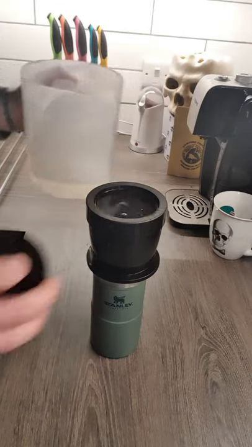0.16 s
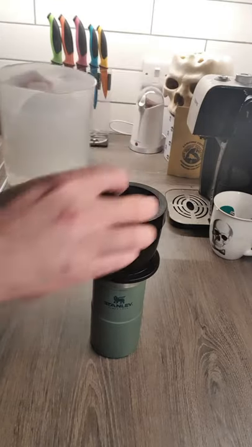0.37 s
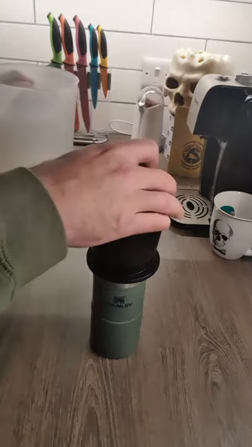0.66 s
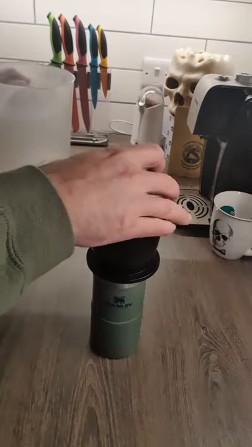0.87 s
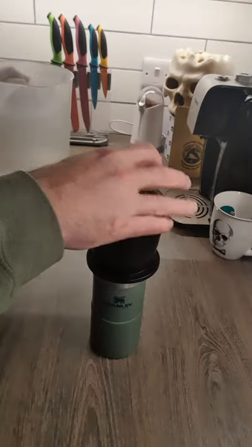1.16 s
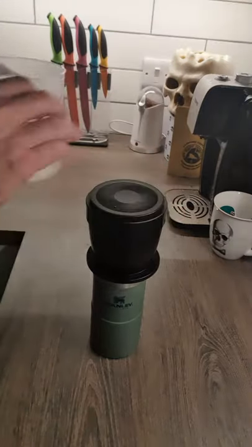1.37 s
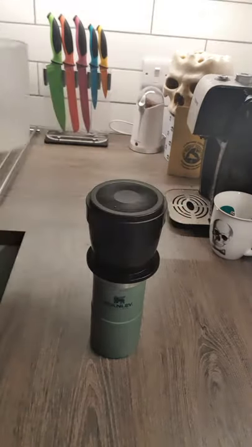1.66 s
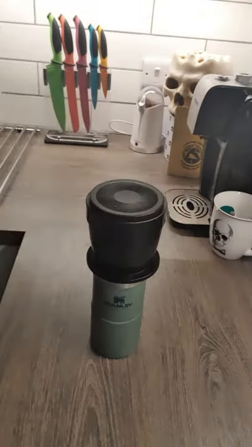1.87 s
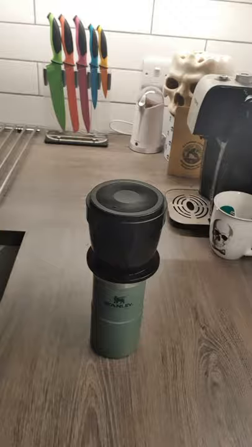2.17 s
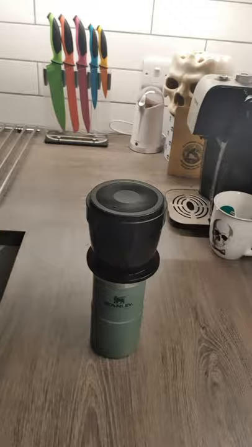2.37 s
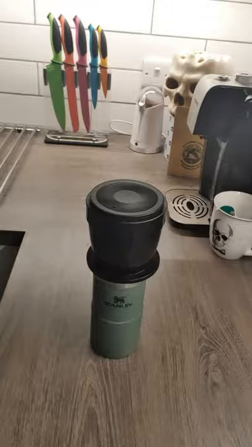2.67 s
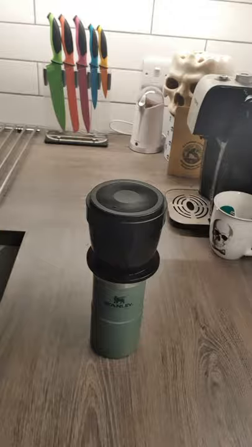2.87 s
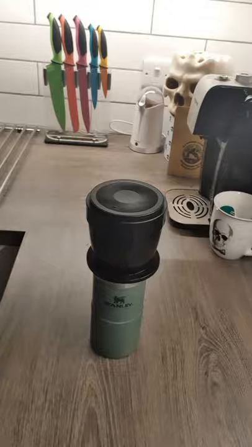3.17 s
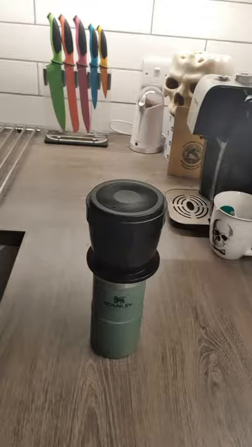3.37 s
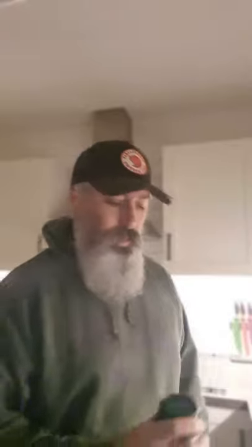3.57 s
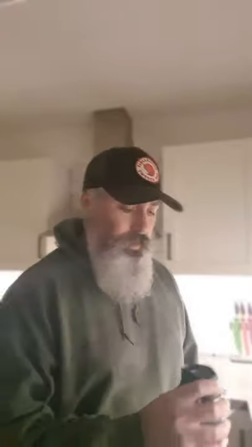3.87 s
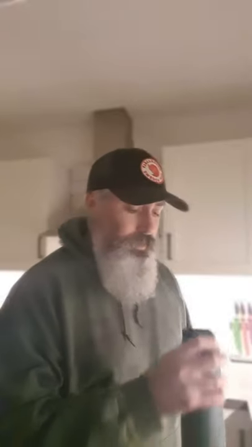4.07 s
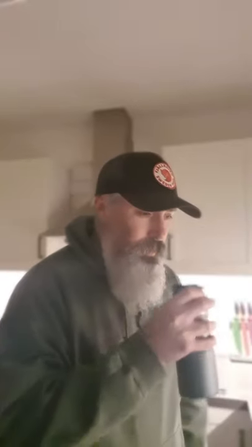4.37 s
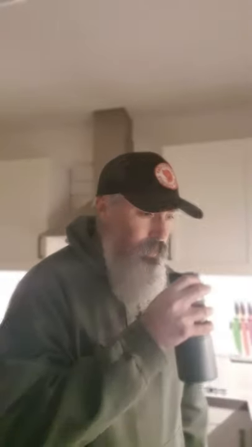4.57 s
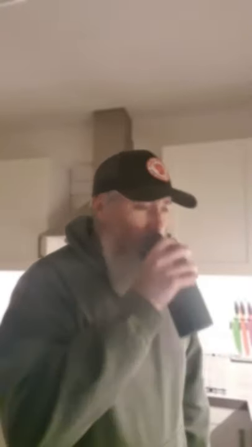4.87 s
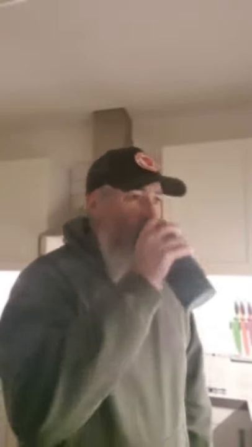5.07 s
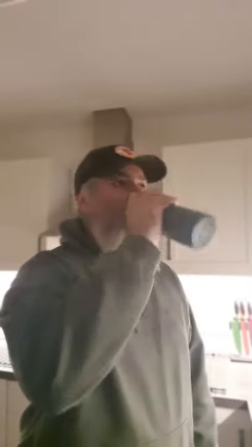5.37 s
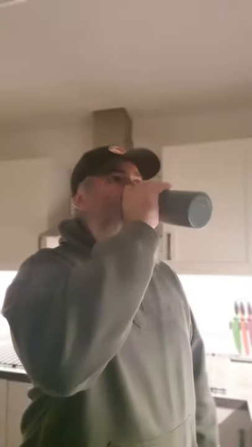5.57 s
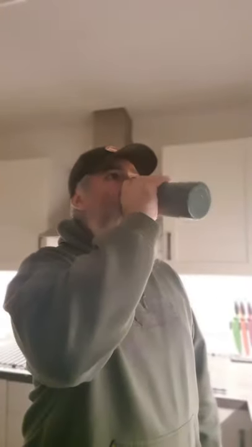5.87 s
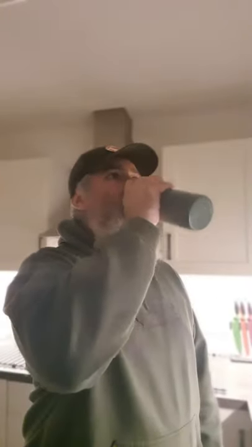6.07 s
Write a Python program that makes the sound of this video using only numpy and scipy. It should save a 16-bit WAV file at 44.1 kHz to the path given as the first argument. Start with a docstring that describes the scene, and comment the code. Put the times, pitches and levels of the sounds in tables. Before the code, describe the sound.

Close up in a small tiled kitchen, coffee drips unevenly through a plastic filter into a steel mug, with hollow plops, high plinks and crackling bubbles. A plastic lid rattles briefly into place and dripping continues, joined by soft low bumps. After a tiny silence, plastic cap clicks sound further from the microphone, then near quiet and faint wet smacks of a sip. An appliance hums throughout.

```python
"""Coffee drips from a plastic filter into a steel travel mug: plops, ringing air in the mug, popping bubbles
and fizz. A lid is rattled onto the filter and rings as struck plastic; a few soft bumps boom low. Then the
scene changes: the mug is handled further away, its cap clicks open and it is tipped for a sip. An appliance
hums throughout, as a set of wavering tones, in a small tiled room made of echoes and fading noise."""
import sys
import numpy as np
from scipy import signal
from scipy.fft import rfft, irfft
from scipy.io import wavfile
from scipy.ndimage import uniform_filter1d

SR = 44100
rng = np.random.default_rng(int(sys.argv[2]) if len(sys.argv) > 2 else 0)


def to_wav(s):
    """Save 16-bit WAV."""
    ch = np.atleast_2d(s).T  # columns
    pcm = np.round(np.clip(ch, -1, 1) * 32767)  # PCM
    wavfile.write(sys.argv[1], SR, pcm.astype(np.int16))


N = 273854
T = np.arange(N) / SR  # time in the scene, seconds
AGE = T[:SR // 2]  # time since a short sound began, seconds
BREAK_START_S, BREAK_END_S = 3.435, 3.459

# All dB levels are those before the room and the microphone.
# In the tables, "fade time" is the seconds a sound takes to fall by 60 dB.

# Drops landing in the mug, heavy and light.
# Each row: start in seconds, level in dB, pitch in Hz, splash level in dB relative to the drop.
DROPS = [(0.0092, -35.5, 1510, -12), (0.0656, -38, 1544, -14), (0.1989, -33.5, 1360, -16),
         (0.222, -52, 1220, -16), (0.292, -47.5, 1330, -3), (0.4756, -46, 1400, -23),
         (0.536, -48, 1380, -14), (0.5523, -41, 1370, -15), (0.617, -47, 1490, -11),
         (0.7078, -38, 1340, 3.5), (0.7884, -40, 1285, -19), (0.8243, -43, 1430, 10),
         (0.853, -46, 1710, -2), (0.9243, -38.5, 1230, -8), (0.936, -44, 1010, -15),
         (0.997, -44.5, 1000, -16), (1.309, -44, 1510, 1), (1.3306, -37, 1230, -11),
         (1.3788, -30.5, 1330, -20), (1.624, -46.5, 1220, -14), (1.6927, -32.5, 1346, -16),
         (1.7192, -39, 1340, -20), (1.772, -46, 1250, -16), (1.792, -40.5, 1270, -18),
         (1.815, -49, 1120, -19), (1.83, -48.5, 970, -16), (1.889, -53.5, 1360, -7),
         (1.9817, -38, 1574, -10), (2.039, -46, 1500, -5), (2.1149, -30, 1583, -21),
         (2.1173, -39.5, 1487, -22), (2.2027, -39.5, 1430, -10), (2.2479, -37, 1530, 0),
         (2.3390, -32, 1415, -20), (2.353, -43, 1210, -16), (2.43, -43.5, 1850, 9.5),
         (2.483, -44, 1260, -5), (2.493, -38.5, 1014, -20), (2.539, -47, 1300, -15),
         (2.568, -48, 1029, -17), (2.632, -44.5, 1260, -20), (2.656, -40.5, 1245, -15),
         (2.75, -47, 1350, -15), (2.767, -41.5, 1010, -19), (2.832, -39.5, 1340, -10),
         (2.905, -47, 1310, -16), (2.9296, -40, 1320, -1), (2.961, -40, 1260, -14),
         (3.0179, -33.5, 1280, -13), (3.09, -42.5, 1284, -14), (3.2227, -43.5, 1220, -22),
         (3.249, -47, 1100, -14), (3.3103, -43, 1540, -16)]
# Smaller drops that come at random.
SMALL_DROPS_PER_S, SMALL_DROP_TOP_DB, SMALL_DROP_RANGE_DB = 3, -53, 6
SMALL_DROP_HZ, SMALL_DROP_SPREAD_HZ, SMALL_SPLASH_DB = 1290, 600, -10
PLOP_RISE_S, PLOP_RISE_SPREAD, PLOP_GLIDE_PER_S = 0.0017, 0.39, 14
# The flat slap of each drop on the surface, relative to the drop.
SLAP_DB, SLAP_HZ = -13, 780
# Droplets thrown back by a drop, relative to it; the pitch falls as the crater widens.
REBOUND_DB, REBOUND_FALL = -12.5, 0.34
# Tiny bubbles between the drops: loudest level, pitch range and upward glide.
PATTER_PER_S, PATTER_TOP_DB, PATTER_HZ, PATTER_GLIDE_PER_S = 40, -60.5, (724, 2380), 7.3
# Fine grains of spray follow each drop (dB relative to it) and trickle on between drops.
SPRAY_DB, SPRAY_T60_S, SPRAY_GRAINS_PER_S = -12.5, .09, 350
TRICKLE_DB, TRICKLE_GRAINS_PER_S = -72.5, 70
# Tone colour of the spray. Each row: frequency in Hz, gain in dB.
SPRAY_COLOUR = [(250, -24), (520, -4), (750, -4.5), (1050, -4), (1600, 1.5), (1900, -12), (2400, -14.5),
                (5000, -42), (12000, -59)]
# Each drop lands elsewhere and stirs the air in another mix.
AIR_SCATTER_DB, AIR_DETUNE = 3.5, .012
# Lengthwise resonances of the air in the mug.
# Each row: typical pitch in Hz, typical level in dB relative to the drop, fade time in seconds.
MUG_AIR = [(481, -19.5, 0.11), (613, -15.5, 0.046), (1020.5, -19, 0.078), (1316, -13.5, 0.11)]


def drops():
    """Each drop plops for a few cycles, splashes, throws back smaller droplets and stirs the air column of the mug."""
    plops, stirred = np.zeros(N), np.zeros(N)
    small = [(s, SMALL_DROP_TOP_DB - SMALL_DROP_RANGE_DB * size,
              SMALL_DROP_HZ + SMALL_DROP_SPREAD_HZ * (pitch - .5), SMALL_SPLASH_DB)
             for s, size, pitch in scatter(SMALL_DROPS_PER_S, size=2)]
    for s, db, hz, splash_db in list(DROPS) + small:
        rise_s = PLOP_RISE_S * np.exp(PLOP_RISE_SPREAD * rng.normal())
        body = plop(hz, rise_s=rise_s, glide_per_s=PLOP_GLIDE_PER_S * rng.normal())
        add(plops, s - .0008, undb(db) * body)

        splash = band(band(burst(0.049) * (1 - fade(.008)), 750, 2000), 680, 2400)
        add(plops, s, undb(db + splash_db - 0.5) * splash)

        slap = plop(SLAP_HZ * np.exp(.15 * rng.normal()), rise_s=0.00064)
        add(plops, s, undb(db + SLAP_DB) * slap)

        spray = strength(colour(contacts(SPRAY_GRAINS_PER_S, SPRAY_T60_S), SPRAY_COLOUR))
        add(plops, s + 0.001985, undb(db + SPRAY_DB) * spray)

        modes = [(mode_hz * (1 + AIR_DETUNE * rng.normal()), mode_db + AIR_SCATTER_DB * rng.normal(), t60)
                 for mode_hz, mode_db, t60 in MUG_AIR]
        add(stirred, s, undb(db) * ring(modes) * (1 - fade(0.0053)))

        # later droplets land in the widening crater and sound lower
        for late, size in rng.random((3, 2)):
            rebound = plop(hz * (1.12 - REBOUND_FALL * late), rise_s=PLOP_RISE_S)
            add(plops, s + .004 + .03 * late, undb(db + REBOUND_DB - 8 * late - 6 * size) * rebound)

    for s, size, pitch in scatter(PATTER_PER_S, size=2):
        hz = np.interp(pitch, (0, 1), PATTER_HZ)
        bubble = plop(hz, rise_s=0.0018, glide_per_s=PATTER_GLIDE_PER_S)
        add(plops, s, undb(PATTER_TOP_DB - 10 * size) * bubble)
    trickle = grains(TRICKLE_GRAINS_PER_S, spread_db=7)
    plops += level(colour(trickle, SPRAY_COLOUR), TRICKLE_DB)

    # the plops are a little louder on the left
    near = kitchen(undb(0.5) * plops, wet_db=-3.5, t60=0.31, echo=0.047, lag_s=0.00017) * undb([[.9], [-.9]])
    return near + kitchen(undb(0.5) * stirred, wet_db=0.5, t60=0.33, echo=0.53, lag_s=-0.00038)


# The first crosswise resonance of the air in the mug, and how strongly a drop stirs it.
RING_HZ, RING_T60_S, RING_SCATTER = 2896, .048, .013
DROP_RING_DB, DROP_RING_SCATTER_DB = -27.5, 3
# Faint droplets that come at random: how many for each resonance, and the loudest level.
DROPLETS_PER_S, DROPLET_TOP_DB = 10, -69
# Droplets that ring a crosswise resonance clearly.
# Each row: start in seconds, level in dB, typical pitch in Hz.
RINGS = [(0.0682, -52.5, 2870), (0.15, -57.5, 3580), (0.2653, -67, 2890), (0.5377, -66, 4360),
         (0.6404, -60, 2890), (0.662, -59, 2880), (0.7073, -48.5, 2870), (0.7075, -63, 4280),
         (0.7901, -53, 4240), (0.822, -57, 3560), (0.8245, -56, 4200), (0.831, -57, 2890),
         (0.868, -60, 3490), (0.9642, -53, 2890), (0.9672, -62.5, 4320), (1.1676, -33, 2854),
         (1.3102, -53.5, 2930), (1.333, -59, 3470), (1.3823, -51.5, 2960), (1.4417, -46.5, 2910),
         (1.5005, -67, 2970), (1.5449, -60, 2870), (1.5524, -58.5, 4260), (1.6931, -45.5, 2902),
         (1.6935, -62, 4220), (1.7533, -50.5, 2890), (1.7918, -51, 2930), (1.8337, -53, 2910),
         (1.8402, -57, 4360), (1.8721, -51.5, 2915), (1.9485, -56.5, 4300), (1.9829, -56, 2920),
         (2.0408, -57, 2850), (2.1146, -55.5, 2900), (2.1425, -57, 2980), (2.1799, -49, 2925),
         (2.2034, -49, 2915), (2.2488, -56, 2900), (2.4314, -50, 2940), (2.531, -53, 2890),
         (2.6419, -66, 2880), (2.6937, -49, 2906), (2.7515, -57, 3570), (2.7541, -55.5, 2946),
         (2.9352, -58.5, 2940), (2.9642, -55.5, 4410), (3.0111, -61, 4340), (3.0824, -61, 2920),
         (3.1862, -57.5, 2930), (3.2121, -58, 2950), (3.3129, -53, 2930)]
# Crosswise resonances rung by the faint droplets. Each row: typical pitch in Hz, relative level in dB.
CROSS_MODES = [(2900, -1), (3470, -3), (4300, -4)]


def rings():
    """Droplets and drops ring the air across the mug, each a little off pitch; fainter droplets fall by chance."""
    track = np.zeros(N)
    chances = rng.standard_normal((len(DROPS), 2))
    stirred = [(s, db + DROP_RING_DB + DROP_RING_SCATTER_DB * size, RING_HZ * (1 + RING_SCATTER * detune))
               for (s, db, _, _), (size, detune) in zip(DROPS, chances)]
    for s, db, hz in list(RINGS) + stirred:
        detune, damping = rng.standard_normal(2)
        tone = ring([(hz * (1 + RING_SCATTER * detune), 0, RING_T60_S * np.exp(.25 * damping))])
        spatter = undb(-6) * peak(band(burst(0.04), .88 * hz, 1.22 * hz))
        add(track, s - .001, undb(db) * (tone + spatter) * (1 - fade(.007)))
    for hz, db in CROSS_MODES:
        for s, size, detune in scatter(DROPLETS_PER_S, size=2):
            plink = ring([(hz * (1 + .1 * (detune - .5)), db + DROPLET_TOP_DB - 8 * size, RING_T60_S)])
            add(track, s, plink)
    return kitchen(undb(2.5) * track, wet_db=-0.5, t60=0.27, echo=0.17, lag_s=.00002)


# Faint bubbles burst by chance and with each drop (dB relative to the drop).
SMALL_POPS_PER_S, SMALL_POP_TOP_DB, SMALL_POP_RANGE_DB = 3, -56, 7
SMALL_POP_HZ, SMALL_POP_SPREAD_HZ, DROP_POP_DB = 7500, 4000, -25
# The fizz comes in uneven spurts, with lone crackles on top.
FIZZ_GRAINS_PER_S, SPURT_DB, SPURTS_PER_S = 900, 1.8, 16
CRACKLES_PER_S, CRACKLE_DB = 22, -15
# The clearest bubbles bursting. Each row: start in seconds, level in dB, pitch in Hz.
POPS = [(0.177, -44, 5800), (0.2596, -38.5, 6160), (0.5352, -49.5, 5560), (0.7068, -47.5, 6040),
        (0.965, -54, 7700), (1.1982, -37, 6240), (1.2895, -42.5, 11900), (1.596, -52, 6640),
        (1.779, -53, 6200), (1.871, -50, 6900), (1.947, -52, 5900), (2.43, -58, 6700), (2.7495, -55, 6070),
        (2.9293, -49.5, 6450), (3.2844, -51, 7100)]
# How busy the fizz of the wet grounds is. Each row: time in seconds, relative level in dB.
FIZZ = [(0.0, -71), (.3, -72), (0.61, -79), (.8, -75), (1.0, -77), (1.16, -66), (1.4, -74.5), (1.65, -71.5),
        (1.94, -66.5), (2.2, -72), (2.55, -82), (3.14, -74), (3.43, -91)]
# Tone colour of the fizz. Each row: frequency in Hz, gain in dB.
FIZZ_COLOUR = [(1180, -43), (2000, -19), (2580, -17.5), (2920, -14), (3860, -26), (4240, -16), (7200, -19),
               (10500, -21), (12500, -17), (15000, -45.5)]


def bubbles():
    """Bubbles burst as short bright noise near one pitch, over the fine clicks of fizzing wet coffee grounds."""
    track = np.zeros(N)
    small = [(s, SMALL_POP_TOP_DB - SMALL_POP_RANGE_DB * size, SMALL_POP_HZ + SMALL_POP_SPREAD_HZ * (pitch - .5))
             for s, size, pitch in scatter(SMALL_POPS_PER_S, size=2)]
    splashed = [(s, db + DROP_POP_DB, SMALL_POP_HZ) for s, db, _, _ in DROPS]
    for s, db, hz in list(POPS) + splashed + small:
        spray = peak(band(band(burst(0.024), 6800, 12500), 4300, 13260))
        tone = peak(band(burst(0.0085), hz / 1.053, hz * 1.12))
        add(track, s, undb(db) * (0.22 * spray + 0.62 * tone))

    fine = grains(FIZZ_GRAINS_PER_S, spread_db=4.5)
    crackles = grains(CRACKLES_PER_S, spread_db=3)
    activity = undb(np.interp(T, *np.transpose(FIZZ)) + SPURT_DB * wander(SPURTS_PER_S))
    fizz = level(colour(fine, FIZZ_COLOUR), db=-6.5)
    fizz += level(band(crackles, 4500, 11000), CRACKLE_DB)
    return kitchen(track + activity * fizz, wet_db=6.0, t60=0.16, echo=1.0)


# The lid flexes at a lower pitch as it settles.
LID_FLEX_HZ, LID_SAG_HZ_PER_S = 1166, 2400
RATTLE_DB, RATTLE_T60_S, RATTLE_CONTACTS_PER_S = -9, 0.05, 1500
# The plastic lid knocking on the filter. Each row: start in seconds, level in dB,
# then the hollow body, the shell and the rattle, each in dB relative to that level.
KNOCKS = [(1.039, -32, 4, -23, -0.5), (1.069, -25, -4.5, -3.5, 2.5), (1.0777, -22.5, -18.5, 2, 0.5),
          (1.092, -27, -14, -2.5, -0.5), (1.1095, -19, -13, -2, -2.5), (1.127, -23.5, -17, -9.5, -11)]
# Resonances of the hollow filter body. Each row: pitch in Hz, relative level in dB, fade time in seconds.
LID_BODY = [(200, -7.5, 0.2), (390, -25.5, 0.11), (443, -2, 0.24), (421, 9, 0.16)]
# Resonances of the lid's shell.
# Each row: typical pitch in Hz, typical relative level in dB, fade time in seconds.
LID_SHELL = [(845, -8, .08), (945, -1.5, .125), (1160, -7, .05), (2030, -11, .02), (2300, -11, .015),
             (3250, 1, .035), (3480, -8, .015), (5030, -17, .05)]
# Tone colour of the rattle along the rim. Each row: frequency in Hz, gain in dB.
LID_RATTLE = [(150, -15), (400, 2), (620, -9), (1000, 7), (1450, -0.5), (2050, 2), (2750, -10.5), (3350, 2),
              (3900, -16.5), (7000, -13), (9000, -16), (12500, -30), (15000, -39)]


def lid():
    """The lid rocks into its seat; each contact flexes it for a few cycles, rings the shell and rattles the rim."""
    flex, rattle = np.zeros(N), np.zeros(N)
    body = peak(ring(LID_BODY)) * (1 - fade(0.0049))
    for s, db, body_db, shell_db, rattle_db in KNOCKS:
        hz = LID_FLEX_HZ - LID_SAG_HZ_PER_S * (s - KNOCKS[0][0])
        add(flex, s, undb(db) * (swell(hz, rise_s=0.0019) + undb(body_db) * body))
        modes = [(mode_hz * (1 + 0.013 * rng.normal()), mode_db + 2 * rng.normal(), t60)
                 for mode_hz, mode_db, t60 in LID_SHELL]
        shell = peak(ring(modes))
        rim = strength(colour(contacts(RATTLE_CONTACTS_PER_S, RATTLE_T60_S), LID_RATTLE))
        add(rattle, s, undb(db) * (undb(shell_db - 3.0) * shell + undb(rattle_db + RATTLE_DB) * rim))
    low = kitchen(undb(1.8) * flex, wet_db=-5.0, t60=0.32, echo=0.118, lag_s=0.00018)
    high = kitchen(undb(1.5) * band(rattle, 120, 10500), wet_db=2.0, t60=0.26, echo=0.4)
    # a little louder on the right
    return (low + high) * undb([[-1.1], [1.1]])


BOOM_RISE_CYCLES, BOOM_LAG_S = 1, .0005
# Soft bumps. Each row: start in seconds, boom level in dB, boom pitch in Hz, hollow knock level in dB.
BUMPS = [(1.112, -41, 114, -59), (1.126, -52.5, 60, -48), (2.934, -32.5, 63.9, -48.5),
         (2.957, -30.5, 62.6, -46.5), (3.019, -42, 64.5, -49), (3.108, -47, 61, -49),
         (3.123, -43.5, 111, -45.5), (3.395, -47, 107.5, -47), (3.419, -48, 102.5, -54),
         (3.977, -48.5, 98.6, -57)]


def bumps():
    """Dull bumps boom as low swelling tones, later on the right, and make hollow plastic knock faintly."""
    booms, knocks = np.zeros(N), np.zeros(N)
    for s, boom_db, hz, knock_db in BUMPS:
        add(booms, s, undb(boom_db) * swell(hz, rise_s=BOOM_RISE_CYCLES / hz))
        hollow = ring([(396.0, -1.5, 0.17), (166.4, 6.0, 0.0516)])
        thud = 0.87 * peak(band(burst(0.093), 119.5, 600))
        add(knocks, s, undb(knock_db) * (hollow + thud))
    booms = band(booms, 59.0, 600)
    low = np.array([booms, np.interp(T - BOOM_LAG_S, T, booms)])
    return low + kitchen(knocks, wet_db=-5.0, t60=0.34, echo=0.18)


# The two stages of every cap click: hollow body in dB relative to the snap, treble gain in dB.
CATCH, SEAT = (-20, 12.6), (1.3, 3)
SEAT_DELAY_S, TICK_T60_S, CAP_DETUNE = .004, .012, .03
# Each snap is followed by a brief scrape of the plastic.
CHATTER, CHATTER_T60_S = .09, .014
# Cap clicks. Each row: start in seconds, level of the catch in dB,
# then the seating knock and the crisp tick, each in dB relative to the catch.
CLICKS = [(3.658, -55.5, -1, -17), (3.977, -56.5, -12, 1), (4.018, -61.5, 1, -14), (4.051, -53.5, 3, -15),
          (4.082, -57, 3, -7), (4.1456, -40.5, -1, -5.5), (4.202, -49, 2.5, -5), (4.211, -60, 8.5, -3),
          (4.338, -37.5, -9, -4), (4.469, -52.5, -13, 0), (4.4751, -34.5, -3.5, 0)]
# Tone colour of the snapping cap. Each row: frequency in Hz, gain in dB.
CAP_COLOUR = [(150, -3), (250, -29), (378, -4.5), (466, 1), (580, -2.5), (700, -6), (810, -6.5),
              (1030, -14), (1220, -7), (1420, -11.5), (1730, -2.5), (2090, -1.5), (2900, -11), (3450, -3),
              (3850, -12.5), (5100, -13), (6000, -23.5), (11800, -24), (15500, -30)]
# Hollow resonances of the cap. Each row: typical pitch in Hz, relative level in dB, fade time in seconds.
CAP_MODES = [(379.5, 1.7, 0.085), (438, 1.7, 0.045), (570, 1.4, 0.059)]
# Tone colour of the crisp tick. Each row: frequency in Hz, gain in dB.
TICK_COLOUR = [(300, -8), (1900, 1), (2900, 3), (5000, 10.5), (7000, -2.5), (12000, -8), (15500, -27)]


def cap():
    """The plastic cap catches with a crisp tick, then seats with a dull knock whose pitch varies a little by chance."""
    track, ticks = np.zeros(N), np.zeros(N)
    for s, db, seat_db, tick_db in CLICKS:
        modes = [(hz * (1 + CAP_DETUNE * rng.normal()), mode_db, t60) for hz, mode_db, t60 in CAP_MODES]
        body = strength(ring(modes) * (1 - fade(0.0035)))
        tick = strength(colour(burst(TICK_T60_S), TICK_COLOUR))
        add(ticks, s, undb(db + tick_db) * tick)
        for delay, stage_db, (body_db, treble_db) in ((0, 0, CATCH), (SEAT_DELAY_S, seat_db, SEAT)):
            # one clean contact, then a little chatter
            push = signal.unit_impulse(len(AGE)) + CHATTER * burst(CHATTER_T60_S)
            snap = strength(colour(push, CAP_COLOUR))
            snap = colour(snap, [(3500, 0.0078), (7000, treble_db)])
            add(track, s + delay, undb(db + stage_db) * (snap + undb(body_db) * body))
    # strong room sound places the cap further off
    far = kitchen(undb(-6) * track, wet_db=6.0, t60=0.43, echo=0.5, lag_s=.00004)
    return far + kitchen(ticks, wet_db=0.5, t60=0.4, echo=0.12)


# Small wet smacks of the sip.
# Each row: start in seconds, level in dB, centre in Hz, width in Hz, fade time in seconds.
SMACKS = [(6.075, -59.5, 1780, 1500, 0.11), (6.099, -56, 1640, 300, 0.045), (6.107, -63, 2380, 1600, .06),
          (6.116, -64.5, 6000, 2780, 0.019), (6.13, -57.5, 4600, 1610, 0.015),
          (6.132, -64, 6000, 5000, .06), (6.144, -62, 2490, 1400, .06)]


def sip():
    """Brief wet smacks, as bursts of filtered noise, as the coffee reaches the rim of the mug."""
    track = np.zeros(N)
    for s, db, hz, width, t60 in SMACKS:
        smack = band(burst(t60), max(hz - width / 2, 50), hz + width / 2)
        add(track, s, undb(db) * strength(smack))
    return kitchen(undb(-1.5) * track, wet_db=4.5, t60=0.39, echo=.2)


# Rubbing plastic, the sleeve lifting, coffee shifting in the tipped mug,
# and one low rumbling swell at 4.9 s.
# Each row: start in seconds, length in seconds, level in dB before the swell, centre in Hz, width in Hz.
RUSTLES = [(0.228, 0.068, -58.5, 2160, 1340), (3.649, 0.13, -67, 2600, 3030),
           (3.975, 0.018, -55.5, 1600, 1200), (3.978, 0.048, -63, 11000, 3000),
           (4.01, 0.035, -62, 1700, 1200), (4.049, 0.011, -57, 1730, 600), (4.075, 0.013, -59, 2190, 600),
           (4.9, 0.2, -65.5, 124, 110), (5.04, 0.105, -76.5, 483, 179.6), (5.351, 0.03, -65.5, 486, 160),
           (6.071, 0.046, -63, 434, 308)]


def rustles():
    """Short swells of fine, uneven slips: filtered noise whose strength jumps every 128 samples."""
    track = np.zeros(N)
    for s, length, db, hz, width in RUSTLES:
        count = int(length * SR)
        noise = rng.standard_normal(count)
        unevenness = np.repeat(undb(4 * rng.standard_normal(count)), 128)[:count]
        slips = band(noise * unevenness, max(hz - width / 2, 50), hz + width / 2)
        add(track, s, level(slips, db) * np.hanning(count))
    return kitchen(undb(-6.0) * track, wet_db=5.5, t60=0.41, echo=0.14)


HUM_WAVER_DB, HUM_WAVER_PER_S = 2.2, 7
# Upper tones of the appliance hum.
# Each row: pitch in Hz, typical level in dB while brewing, typical level in dB after the break.
HUM = [(50.2, -73, -85.5), (153.6, -72.5, -87.5), (200, -91, -72.5), (328.3, -80.5, -75), (387, -74.5, -80),
       (433, -71, -112.5), (495, -68.5, -82), (571.6, -69, -86.5)]


def hum(column, mains_db, motor_db, beat_at_s):
    """Mains buzz beats slowly against a slipping motor; all tones waver in strength, those of the table in pitch too."""
    mains_hz, motor_hz = 100, 98.15
    out = undb(mains_db) * np.cos(2 * np.pi * mains_hz * (T - beat_at_s))
    out += undb(motor_db) * np.cos(2 * np.pi * motor_hz * (T - beat_at_s))
    out *= undb(HUM_WAVER_DB * wander(HUM_WAVER_PER_S))
    for row in HUM:
        db = row[column] + HUM_WAVER_DB * wander(HUM_WAVER_PER_S)
        phase = 2 * np.pi * row[0] * T + 1.2 * wander(HUM_WAVER_PER_S)
        out += np.sqrt(2) * undb(db) * np.sin(phase)
    return out


AIR_BREW_DB, AIR_LATER_DB = -60.5, -66.5
AIR_DRIFT_DB, AIR_DRIFT_PER_S = .7, 6
# Tone colour of the room air while brewing. Each row: frequency in Hz, relative level in dB.
AIR_BREW = [(15, -4.5), (25, -16), (80, -3.5), (125, 4.5), (274, -6.5), (509, -1.5), (703, -9), (1340, -30),
            (1900, -28.5), (2560, -30), (2920, -15.5), (3830, -32), (4380, -43), (5280, -26.5),
            (11500, -39.5), (15500, -43)]
# Tone colour of the room air after the break. Each row: frequency in Hz, relative level in dB.
AIR_LATER = [(15, -85), (25, -10), (75, -11), (144, -4), (173, -9.5), (215, -7), (509, -15.5), (804, -30),
             (895, -26), (1710, -25), (2010, -32.5), (2230, -24), (4380, -34), (5050, -29.5), (5600, -36.5),
             (7500, -31), (9700, -38.5), (11800, -44), (15500, -50)]


def air(spectrum, db, wide_hz):
    """Room noise that drifts a little in level; its bass is nearly alike on both sides."""
    mid, side = (colour(rng.standard_normal(N), spectrum) for _ in range(2))
    side = 1.03 * band(side, wide_hz, 21600) + 0.13 * side
    return level(mid + np.array([side, -side]), db) * undb(AIR_DRIFT_DB * wander(AIR_DRIFT_PER_S))


# Course of the faint top hiss after the break. Each row: time in seconds, relative level in dB.
HISS = [(3.46, -86.5), (4.6, -87), (5.2, -81), (5.6, -95), (6.2, -99)]


def hiss():
    """A thin top hiss of filtered noise that swells once and then fades towards the end."""
    noise = band(rng.standard_normal((2, N)), 10500, 13500)
    return level(noise, db=-2) * undb(np.interp(T, *np.transpose(HISS)))


# Near reflections from worktop and tiles.
# Each row: left delay in seconds, right delay in seconds, relative gain (a plain factor).
ECHOES = [(.0021, 0.0035, 0.57), (.0055, 0.0043, 0.41), (0.0091, 0.0094, 0.27)]


def kitchen(x, wet_db, t60, echo, lag_s=0):
    """Direct sound (later on the left by the lag), near reflections and a diffuse tail whose treble dies sooner."""
    out = []
    for side in range(2):
        tail = band(burst(t60), 180, 3000) + band(burst(t60 * 0.84), 3700, 9400)
        # things on the worktop scatter the first milliseconds
        tail += 1.35 * band(burst(0.099), 400, 10000)
        tail *= 1 - np.exp(-AGE / 0.0014)
        response = tail * undb(wet_db) / np.linalg.norm(tail)
        # a negative lag delays the right side instead
        delay = max(lag_s * (1 - 2 * side), 0)
        response += np.sinc((AGE - delay) * SR)
        for row in ECHOES:
            response[int(row[side] * SR)] += echo * row[2]
        out.append(signal.fftconvolve(x, response)[:N])
    return np.array(out)


def plop(hz, rise_s, glide_per_s=0):
    """A few cycles with a rounded start; the pitch may glide by a share per second."""
    age = AGE[:SR // 25]
    envelope = (age / rise_s * np.exp(1 - age / rise_s)) ** 2
    return envelope * np.sin(2 * np.pi * hz * age * (1 + glide_per_s * age / 2))


def swell(hz, rise_s):
    """A tone whose envelope builds up to one and dies away."""
    return AGE / rise_s * np.exp(1 - AGE / rise_s) * np.sin(2 * np.pi * hz * AGE)


def ring(modes):
    """Struck resonances, each a fading sine, from rows of Hz, dB and fade time in seconds."""
    return sum(undb(db) * fade(t60) * np.sin(2 * np.pi * hz * AGE) for hz, db, t60 in modes)


def burst(t60):
    """A short crack of fading noise."""
    return rng.standard_normal(len(AGE)) * fade(t60)


def contacts(per_s, t60):
    """A flurry of tiny uneven contacts that dies away, with one sure contact at its start."""
    hits = rng.random(len(AGE)) < per_s / SR
    return hits * burst(t60) + .3 * signal.unit_impulse(len(AGE))


def grains(per_s, spread_db):
    """A steady rain of tiny clicks, a few much larger than the rest."""
    sizes = undb(spread_db * np.minimum(rng.exponential(size=N), 3.5))
    return (rng.random(N) < per_s / SR) * sizes * rng.choice([-1, 1], N)


def scatter(per_s, size):
    """Chance events while the coffee brews: rows of a time and some random shares from 0 to 1."""
    return rng.random((int(per_s * BREAK_START_S), 1 + size)) * np.r_[BREAK_START_S, np.ones(size)]


def wander(per_s):
    """A slow random curve through new points at the given rate, with a spread near one."""
    knots = np.arange(0, T[-1] + 1, 1 / per_s)
    return np.interp(T, knots, rng.standard_normal(len(knots)))


def fade(t60):
    """Exponential decay by 60 dB in the given seconds."""
    return np.exp(-np.log(1000) * AGE / t60)


def colour(x, points):
    """Filter through (Hz, dB) points that never sounds ahead of its input (minimum phase)."""
    hz, db = np.transpose(points)
    size = 4096
    grid = np.maximum(np.arange(size // 2 + 1) * SR / size, 1)
    cepstrum = irfft(np.log(undb(np.interp(np.log(grid), np.log(hz), db))))
    # folding the cepstrum puts the filter's response after time zero
    cepstrum[1:size // 2] *= 2
    cepstrum[size // 2 + 1:] = 0
    return signal.fftconvolve(x, irfft(np.exp(rfft(cepstrum))))[:len(x)]


def band(x, lo_hz, hi_hz):
    """Gentle band-pass."""
    return signal.sosfilt(signal.butter(2, [lo_hz, min(hi_hz, SR / 2 - 1)], "band", fs=SR, output="sos"), x)


def undb(db):
    """Decibels to gain."""
    return 10 ** (np.asarray(db) / 20)


def level(x, db):
    """Scale to an rms (average) level."""
    return x * undb(db) / np.sqrt(np.mean(x ** 2))


def peak(x):
    """Scale to a peak of one."""
    return x / np.abs(x).max()


def strength(x):
    """Scale a short sound to the energy of two milliseconds at rms one."""
    return x * np.sqrt(.002 * SR) / np.linalg.norm(x)


def add(track, s, sound):
    """Mix a sound into a track at a time in seconds."""
    i = max(int(s * SR), 0)
    track[i:i + len(sound)] += sound[:N - i]


def scene():
    """Brewing, then the scene changes to drinking."""
    brewing = drops() + rings() + bubbles() + lid()
    brewing += air(AIR_BREW, AIR_BREW_DB, wide_hz=404)
    brewing += hum(1, mains_db=-63.0, motor_db=-93.5, beat_at_s=0.33)
    later = cap() + sip() + hiss() + air(AIR_LATER, AIR_LATER_DB, wide_hz=320.0)
    later += hum(2, mains_db=-68.5, motor_db=-67.5, beat_at_s=5.02)
    # gates with edges softened over 64 samples
    before, after = (uniform_filter1d(gate * 1., 64) for gate in (T < BREAK_START_S, T > BREAK_END_S))
    return before * brewing + after * later + (before + after) * (bumps() + rustles())


TOP_HZ = 15500
# The microphone port rings in the top treble. Each row: frequency in Hz, gain in dB.
PORT = [(10600, -0.5), (11350, 6), (12300, 0.5)]


def record(dry):
    """The microphone drops the deepest bass, rings at its port and cuts the top."""
    sound = signal.sosfilt(signal.butter(3, 38, "high", fs=SR, output="sos"), dry)
    sound = np.array([colour(channel, PORT) for channel in sound])
    return signal.sosfilt(signal.ellip(8, .2, 70, TOP_HZ, fs=SR, output="sos"), sound)


dry = scene()
out = record(dry)
to_wav(out)
```